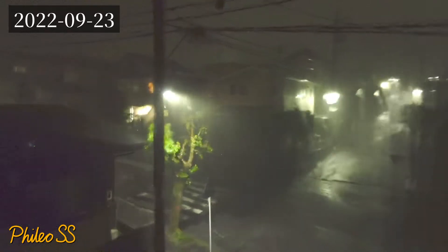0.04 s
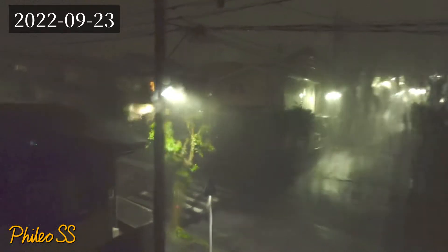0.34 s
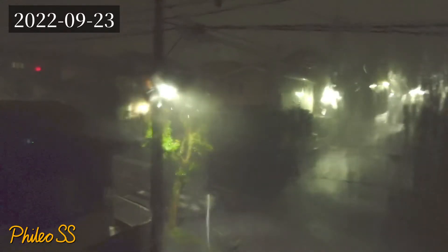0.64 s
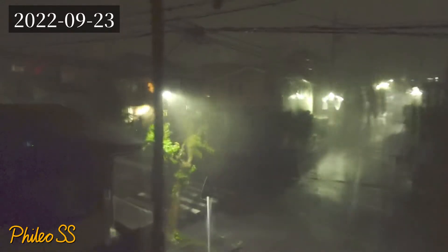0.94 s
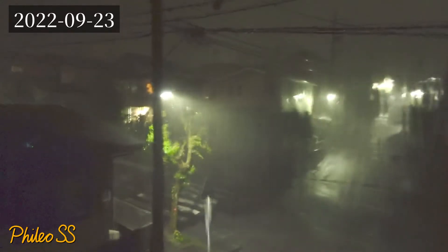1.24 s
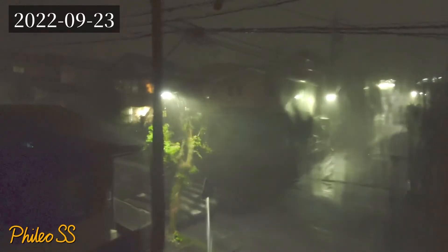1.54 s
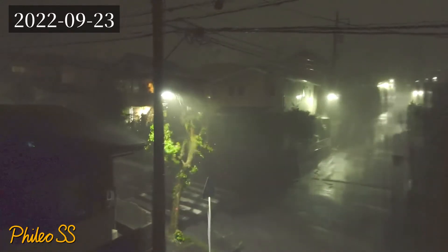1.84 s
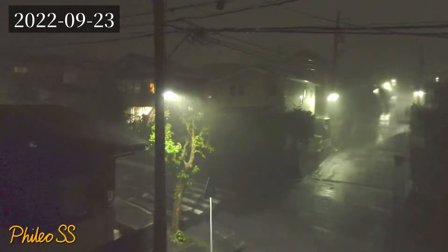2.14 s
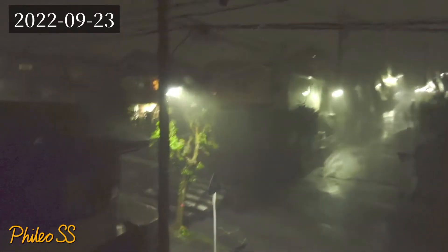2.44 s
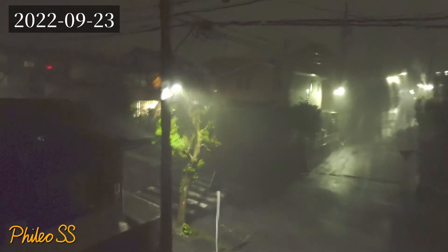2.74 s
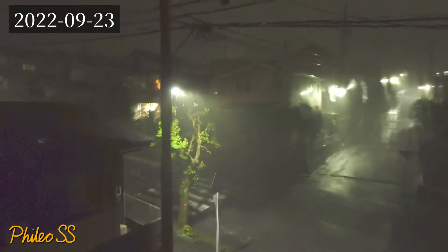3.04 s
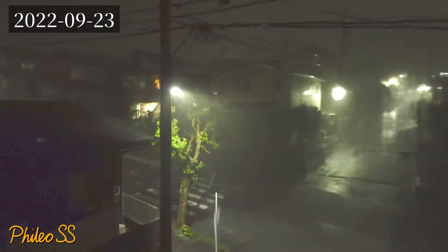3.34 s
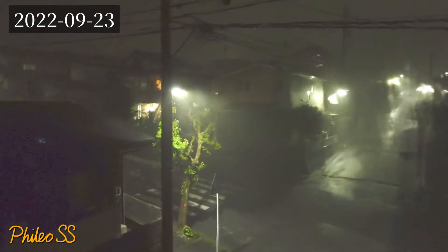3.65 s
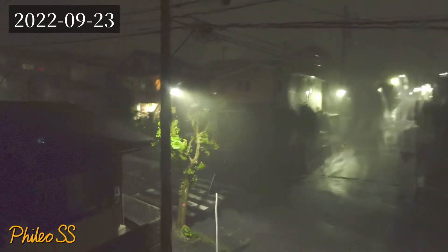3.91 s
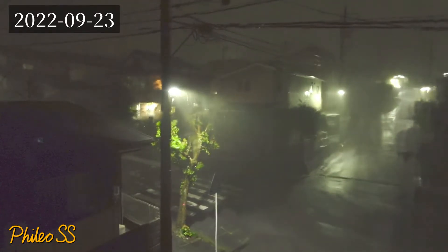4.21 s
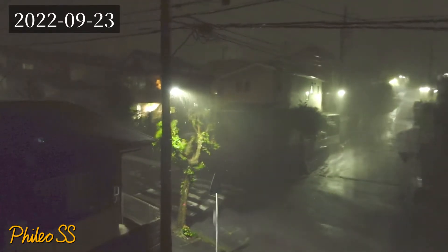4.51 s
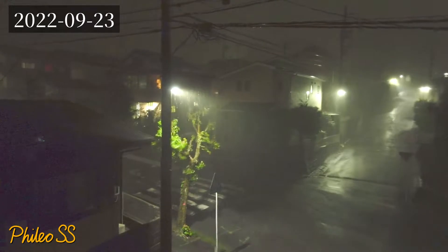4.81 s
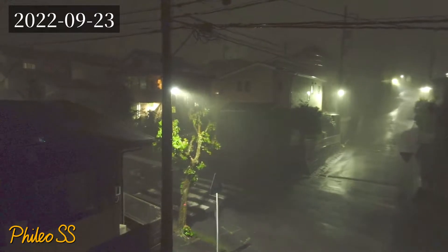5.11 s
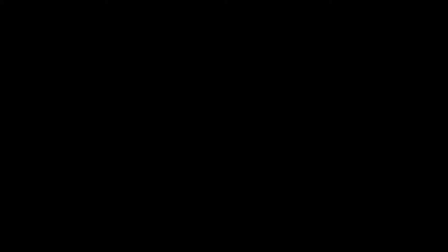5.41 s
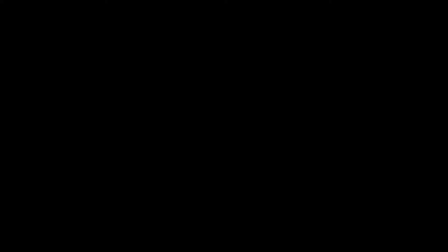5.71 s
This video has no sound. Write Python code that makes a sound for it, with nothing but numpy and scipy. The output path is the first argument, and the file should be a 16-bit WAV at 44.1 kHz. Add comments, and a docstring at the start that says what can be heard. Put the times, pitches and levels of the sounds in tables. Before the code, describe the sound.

Torrential rain falls on a residential street at night, heard from under an awning. Distant drops merge into a dense rushing hiss with tiny plinks in the puddles. Gusts throw sheets of rain onto the awning, which patters, drums and crackles with spray, while fat drips splat close by and the wind moans faintly. After about two seconds the gusts weaken and the downpour keeps easing. One dry tick comes late.

```python
"""Torrential rain on a street at night, heard from under an awning.
From the start, far drops merge into a rushing wash, with bubbles plinking in the puddles. Gusts throw
sheets of rain on the awning, which patters, drums and sprays; fat drips from its edge splat close by
and the wind moans faintly in a gap. After the first two seconds the gusts are weaker, and the downpour
keeps easing. One dry tick comes late, and the sound stops abruptly at about 5.4 s."""
import sys
import numpy as np
from scipy import signal
from scipy.fft import rfft, irfft, next_fast_len
from scipy.io import wavfile
from scipy.ndimage import uniform_filter1d

SR = 44100
rng = np.random.default_rng(int(sys.argv[2]) if len(sys.argv) > 2 else 0)


def bounce(signal):
    """Save signal as a 16-bit WAV file at the path given by the first command-line argument."""
    frames = np.transpose(np.atleast_2d(signal))
    limited = np.clip(frames, -1, 1)
    pcm = np.round(limited * 32767).astype(np.int16)
    wavfile.write(sys.argv[1], SR, pcm)


N = 258774
T = np.arange(N) / SR
STOP_S = 5.364
STRENGTH, DRUM, SPRAY = 0, 1, 2  # the three controls of the rain
STEADY_DB = (-26, -26, -41)  # their starting levels, gusts aside

# stereo image of the close sounds: f/Hz, left-right likeness/0..1
NEAR_LIKENESS = [(300, 1), (700, 0.91), (1300, 0.93), (2000, 0.59), (5000, 0.82), (8000, 0.68),
                 (11000, 0.44), (14000, .8)]


def amp(db):
    """Decibels to gain."""
    return 10 ** (np.asarray(db) / 20)


def unit_rms(x):
    """Scale to an rms of 1."""
    return x / np.sqrt(np.mean(x ** 2) + 1e-20)


def curve_at(points, hz):
    """Read a curve of (f/Hz, value) points, joined by straight lines in log frequency."""
    f, value = np.transpose(points)
    return np.interp(np.log(hz + 1), np.log(f + 1), value)


def colour(x, spectrum_db, size=8192):
    """Minimum-phase EQ with the gain spectrum_db(hz): clicks keep their sharp front."""
    hz = abs(np.fft.fftfreq(size, 1 / SR))
    log_gain = np.log(amp(np.maximum(spectrum_db(hz), -100)))
    response = np.exp(np.conj(signal.hilbert(log_gain)))
    taps = np.fft.ifft(response).real[:size // 2]
    return signal.oaconvolve(x, taps[None], axes=1)[:, :x.shape[1]]


def stereo(pair, likeness):
    """Blend two unrelated signals into left and right, alike by a share that depends on frequency."""
    size = next_fast_len(pair.shape[1])
    hz = np.fft.rfftfreq(size, 1 / SR)
    width = 1 - np.clip(curve_at(likeness, hz), 0, 1)
    width *= np.minimum(hz / 330, 1) ** 2  # long waves reach both sides alike
    mid, side = rfft(pair, size) * np.sqrt([2 - width, width])
    return irfft(np.array([mid + side, mid - side]), size)[:, :pair.shape[1]]


def wander(step_s):
    """A random curve that glides to a new value every step."""
    return np.interp(T / step_s, np.arange(N), rng.standard_normal(N))


def swell(peak_s, db, rise_s, fall_s):
    """Power of one gust over time: it builds to a fairly pointed peak and dies away."""
    from_peak = np.maximum((peak_s - T) / rise_s, (T - peak_s) / fall_s)
    return (amp(db) * np.exp(-abs(from_peak) ** 1.3)) ** 2


def rain_db(control):
    """Level of one rain control over time: gusts ride on an easing, fluttering downpour."""
    # gusts on the awning: peak t/s, strength/dB, drumming/dB, spray/dB, rise/s, fall/s
    gusts = [(.03, -27, -35, -38, 0.13, 0.066), (.2, -21.5, -39, -29.5, 0.057, 0.033),
             (.34, -19, -25, -24, 0.13, 0.24), (.52, -22.5, -25, -26, 0.12, 0.18),
             (.64, -16, -20.5, -23.5, 0.067, 0.16), (1.18, -25, -42, -35, 0.097, 0.094),
             (1.35, -22, -25.5, -25.5, 0.14, 0.29), (1.82, -28.5, -28.5, -39.5, 0.39, 0.26),
             (2.58, -29, -29.5, -42, 0.049, 0.095), (3.35, -35, -32.5, -58, 0.33, 0.44),
             (3.67, -27.5, -29, -52, 0.12, 0.13), (4.2, -42, -53, -39, 0.079, 0.15),
             (4.38, -33, -32, -45, 0.13, 0.18), (5.25, -31.5, -32, -49, 0.47, 0.39)]
    easing_db_per_s, flutter_db = 1.65, 0.65
    steady_power = amp(STEADY_DB[control] - easing_db_per_s * T) ** 2
    gust_power = sum(swell(peak_s, levels[control], rise_s, fall_s)
                     for peak_s, *levels, rise_s, fall_s in gusts)
    return 10 * np.log10(steady_power + gust_power) + flutter_db * wander(step_s=0.051)


def drops(per_s, spread_db, splash_s):
    """Random impacts of uneven size, each a brief dying burst of spatter."""
    sizes = amp(spread_db * np.minimum(rng.exponential(1, N), 5))
    impacts = sizes * (rng.random(N) < per_s / SR)
    power = signal.lfilter([1], [1, -np.exp(-2 / (splash_s * SR))], impacts ** 2)
    return unit_rms(np.sqrt(power) * rng.standard_normal((2, N)))


def patchy(x, depth_db, bands, frames):
    """Drops land on changing spots, so narrow bands swell and fade on their own."""
    spectra = signal.stft(x, nperseg=512, noverlap=384)[2]
    patches = uniform_filter1d(rng.standard_normal(spectra.shape[1:]), bands, axis=0)
    patches = unit_rms(uniform_filter1d(patches, frames, axis=1))
    return signal.istft(spectra * amp(depth_db * patches), nperseg=512, noverlap=384)[1][:, :N]


def street():
    """Countless far drops merge into a wash that swells only a little with the gusts."""
    # tone of the wet street: f/Hz, level/dB
    wash_eq = [(25, -26), (45, -19), (70, -3.5), (100, -6.5), (160, -0.5), (560, -1.5), (850, -2),
               (1130, -1.2), (1500, -1), (2100, 1.5), (2800, -0.8), (3700, -3), (5000, 0), (5900, -8.5),
               (7800, -13), (9500, -41.5), (12500, -39.5), (15700, -48)]
    # its stereo image: f/Hz, left-right likeness/0..1
    far_likeness = [(300, 0.93), (700, 0.81), (1300, 0.57), (1800, 0.92), (3000, 0.33), (4900, 0.69),
                    (7500, 0.4), (9500, .57), (11000, 0.46), (13000, .6)]
    # its lean to one side: f/Hz, left over right/dB
    lean = [(300, -1), (1100, -1.5), (1700, 3.5), (3300, 3), (5000, 1), (7000, -2.5), (9000, -10.5),
            (10800, -11), (12500, 0.5)]
    rain = drops(per_s=3100, spread_db=-1.0, splash_s=0.0014)
    rain = patchy(rain, depth_db=0.7, bands=9, frames=5)
    wash = unit_rms(stereo(colour(rain, lambda hz: curve_at(wash_eq, hz)), far_likeness))
    lean_db = curve_at(lean, np.fft.rfftfreq(N, 1 / SR))
    wash = irfft(rfft(wash) * amp([lean_db / 2, -lean_db / 2]), N)
    return wash * amp(-32 + 0.29 * (rain_db(STRENGTH) + 31))


def plinks(count=600, size=2048):
    """Drops in puddles trap bubbles: short, slightly rising notes, half buried in the wash."""
    out, t = np.zeros((2, N + size)), np.arange(size) / SR
    strength_db = rain_db(STRENGTH)
    for when, pitch, length, loud, side in rng.random((count, 5)):
        at, hz = int(when * STOP_S * SR), 1250 * 5 ** pitch
        life_s = (5 + 14 * length) / hz
        envelope = np.exp(-t / life_s) * (1 - np.exp(-t * hz))
        note = np.sin(2 * np.pi * hz * t * (1 + 0.013 * t / life_s)) * envelope
        level_db = -34 + 7.4 * loud ** 3 + 0.31 * (strength_db[at] + 25)
        out[:, at:at + size] += note * amp(level_db + 4 * (side - .5) * np.array([[1], [-1]]))
    return out[:, :N]


def patter():
    """Near drops on the awning take over from the street as a gust rises."""
    # tone of drops striking the awning: f/Hz, level/dB
    patter_eq = [(60, -42.5), (200, 0.5), (500, 5), (700, 5.5), (880, 2.5), (1140, 3.5), (1600, 2),
                 (2700, -1), (4100, 1), (4900, 3.5), (5500, -5), (7000, -5), (9000, -13.5), (12000, -28),
                 (15700, -39.5)]
    rain = drops(per_s=3500, spread_db=2.5, splash_s=0.0071)
    rain = patchy(rain, depth_db=1.7, bands=7, frames=5)
    hits = unit_rms(stereo(colour(rain, lambda hz: curve_at(patter_eq, hz)), NEAR_LIKENESS))
    exposure = 1 / (1 + amp(2.06 * (-30 - rain_db(STRENGTH))))  # in a lull few drops reach it
    return hits * exposure * amp(rain_db(STRENGTH) + 0.5)


def drumming():
    """Dense rain thuds on the awning's panel and rings its low modes, alike in both ears."""
    # the panel's modes: f/Hz, width/Hz, level/dB
    modes = [(99.9, 22, 2), (141, 22, 4.5), (161.5, 27, -10.5), (192, 24, -2.5), (238.5, 34, 7.5),
             (342.5, 25, 5.5), (409, 19, 4), (437, 35, 5), (546, 27, 6.5), (694, 31, 1), (806, 22, 3),
             (1106, 99, 8)]
    # tone of a thud: f/Hz, level/dB
    thud_eq = [(20, -47), (38, -41.5), (50, -24), (70, -11.5), (100, 0), (200, -2), (450, -2.5), (700, -5),
               (1200, -12.5), (3000, -49.5)]
    sway_below_hz, sway_follow = 170, 0.65  # the deepest sway answers a gust only in part

    def panel_db(hz):
        resonance = sum(amp(db) ** 2 / (1 + (2 * (hz - f) / width) ** 2) for f, width, db in modes)
        return 10 * np.log10(resonance + amp(-14) ** 2) + curve_at(thud_eq, hz)

    thuds = drops(per_s=1200, spread_db=1.5, splash_s=.001)[:1]
    panel = unit_rms(colour(thuds, panel_db))
    sway = signal.sosfiltfilt(signal.butter(4, sway_below_hz, fs=SR, output="sos"), panel)
    rings = patchy(panel - sway, depth_db=1.1, bands=30, frames=2)
    drum_db = rain_db(DRUM)
    sway_db = -29.5 + sway_follow * (drum_db - STEADY_DB[DRUM])
    return rings * amp(drum_db - 3) + sway * amp(sway_db)


def spray():
    """Tiny rebounding droplets crackle on top."""
    # tone of the droplets: f/Hz, level/dB
    spray_eq = [(3000, -28.5), (5500, 8.5), (7000, -0.5), (8200, 0.5), (10000, -5.5), (12000, -17.5),
                (15700, -28)]
    rain = drops(per_s=450, spread_db=2.0, splash_s=0.0024)
    rain = patchy(rain, depth_db=1.5, bands=5, frames=3)
    crackle = unit_rms(stereo(colour(rain, lambda hz: curve_at(spray_eq, hz)), NEAR_LIKENESS))
    return crackle * amp(rain_db(SPRAY) - 3)


def mist(peak_hz=10400):
    """Hard gusts shatter drops finer: very short ticks in the top treble."""
    def mist_db(hz):
        return -22 * abs(np.log2((hz + 1) / peak_hz)) - 30 * np.log2(np.maximum(hz / peak_hz, 1))

    ticks = colour(drops(per_s=900, spread_db=1.0, splash_s=.0005), mist_db)
    return unit_rms(stereo(ticks, NEAR_LIKENESS)) * amp(-16.5 + 1.21 * rain_db(SPRAY))


def splats(size=4096):
    """Each drip, fat or small, slaps, bursts into droplets and leaves a faint tail off the wall."""
    # fat drips off the edge: t/s, level/dB, splash/s, ring f/Hz, ring boost/dB, top slope/(dB/octave)
    fat_drips = [(.038, -18, 0.011, 5100, 4, -3), (.22, -16.5, .005, 8000, -7, -7),
                 (.264, -9.5, 0.0042, 6500, 0, -1), (0.327, -14.5, 0.0081, 8500, 5, 7),
                 (.35, -15.5, .0075, 7060, -7, 6), (0.42, -20.5, 0.02, 7500, 0, 6),
                 (0.613, -20, 0.0054, 6500, 14, 2), (.626, -18, 0.0086, 7000, 8, 7),
                 (.645, -14.5, 0.015, 4960, 3, 6), (0.685, -15.5, 0.0059, 4500, -5, -3),
                 (.725, -20, 0.01, 4600, 12, -5), (0.7605, -18, 0.0048, 4800, 1, -6),
                 (0.8212, -18.5, 0.0057, 6200, 8, 5), (1.151, -21.5, 0.0076, 2700, 9, -23),
                 (1.209, -25, 0.0074, 1490, 2, -18), (1.226, -25, .004, 9000, 6, 8),
                 (1.316, -16.5, .011, 4700, 2, -21), (1.358, -20, 0.0054, 6260, 5, -6),
                 (1.456, -20, .008, 6300, 0, -7), (1.539, -22, 0.016, 4400, 0, -11),
                 (1.625, -17, 0.012, 6300, 11.5, 2), (1.640, -20, 0.0092, 7500, 2, -2),
                 (1.734, -24.5, .0054, 3700, 5, -11), (2.1212, -19, 0.007, 4900, 5, 0),
                 (2.329, -32, 0.009, 1360, 18, -17), (2.357, -30, 0.011, 1310, 20, -12),
                 (2.552, -26, 0.01, 5200, 2, -11), (2.567, -28, 0.0057, 5000, 3, -13),
                 (2.6152, -20.5, 0.0053, 4190, 7, -15), (3.046, -35, .005, 7500, 6, 4),
                 (3.078, -32, .004, 8040, 8, 4), (3.622, -23.5, 0.0055, 5400, 3, -7),
                 (3.639, -21.5, 0.0069, 4400, 0, -16), (3.664, -21.5, 0.0057, 1220, 10, -14),
                 (3.838, -31, 0.013, 5500, -7, -16), (3.933, -24.5, 0.012, 1400, 6, -6),
                 (4.0857, -20.5, 0.005, 4500, 6, -12), (4.191, -25, 0.0034, 4300, 8, -16),
                 (4.24, -31.5, .012, 5950, 12, -14), (4.318, -27, 0.006, 6200, 1, -12),
                 (4.3626, -29.5, .008, 4700, 19, -11), (4.518, -33, .01, 1010, 20, -12),
                 (5.059, -33, .008, 2400, 16, -16), (5.208, -32.5, .007, 7400, 8, 0),
                 (5.323, -28.5, 0.004, 1600, 14, -5)]
    # tone of a splash: f/Hz, level/dB
    splash_eq = [(300, -17.5), (1200, 3.5), (2500, -1), (4600, 5), (5600, 0.5), (7000, -0.5), (9000, -6.5),
                 (12000, -18), (15700, -30.5)]
    ring_half_width = 0.13  # share of the ring's frequency
    out, t = np.zeros((2, N + size)), np.arange(size) / SR
    attack = 1 - np.exp(-t / 0.0014)  # a drop takes a moment to flatten and burst
    wall_tail = 0.39 * np.exp(-t / .02)
    for start_s, db, splash_s, ring_hz, ring_db, slope_db in fat_drips + small_drips():
        def splash_db(hz):
            # each drip's own treble slope makes it duller or crisper
            tilt = slope_db * np.log2(np.maximum(hz / max(ring_hz, 6500), 1))
            ring = ring_db / (1 + ((hz - ring_hz) / (ring_half_width * ring_hz)) ** 2)
            return curve_at(splash_eq, hz) + tilt + ring

        droplets = amp(2.1 * unit_rms(uniform_filter1d(rng.standard_normal(size), size=24)))
        spatter = stereo(rng.standard_normal((2, size)) * droplets, NEAR_LIKENESS)
        burst = unit_rms(colour(spatter, splash_db))
        slap = np.exp(-(t / splash_s) ** 2)
        pan_db = -1.5 + 1.3 * rng.standard_normal()  # the dripping edge lies a little to the right
        gains = amp(db + np.array([[pan_db], [-pan_db]]) / 2)
        at = round(start_s * SR)
        out[:, at:at + size] += burst * attack * (slap + wall_tail) * gains
    return out[:, :N]


def small_drips(count=24, ring_db=8, slope_db=-6.5):
    """Cues for splats(): small drips at random moments, heavier in the gusts."""
    when, loud, length, pitch = rng.random((count, 4)).T
    start_s = when * STOP_S
    surge_db = rain_db(STRENGTH)[(start_s * SR).astype(int)] - STEADY_DB[STRENGTH]
    level_db = -35 + 0.7 * surge_db + 3.5 * (2 * loud - 1)
    splash_s = 0.0071 * (.5 + length)
    ring_hz = 6200 * 2 ** (0.92 * (pitch - .5))
    return [(*drip, ring_db, slope_db) for drip in zip(start_s, level_db, splash_s, ring_hz)]


def moans(waver_hz=2, air_width_hz=24):
    """Wind across a gap: thin, breathy, wavering notes that glide as the gust passes."""
    # wind notes: peak t/s, level/dB, rise/s, fall/s, f/Hz at the peak, glide/(Hz/s)
    notes = [(.24, -30, 0.13, 0.16, 442.5, -18.5), (.76, -33, .08, .07, 446, 29.5),
             (1.21, -38, 0.043, .04, 427, 20), (1.4, -32, 0.04, .04, 454, -300),
             (1.508, -29.5, 0.07, 0.13, 434, -19.5), (1.631, -33, .05, 0.19, 401, 23.5),
             (2.22, -40.5, 0.059, .07, 432, -10.5), (3.3, -38, 0.098, 0.17, 425, 40)]
    out = np.zeros(N)
    for peak_s, db, rise_s, fall_s, hz, glide in notes:
        pitch = hz + glide * (T - peak_s) + waver_hz * wander(step_s=.06)
        phase = 2 * np.pi * np.cumsum(pitch) / SR
        air = wander(1 / air_width_hz) * np.cos(phase) + wander(1 / air_width_hz) * np.sin(phase)
        envelope = np.sqrt(swell(peak_s, db, rise_s, fall_s))
        out += unit_rms(np.sin(phase) + 0.44 * air) * envelope
    return out


def tick(at_s=4.697):
    """One thin, dry click."""
    return amp(-26) * (np.arange(N) == round(at_s * SR))


def scene():
    """The far street, the near awning and the wind together."""
    return street() + plinks() + patter() + drumming() + moans() + spray() + mist() + splats() + tick()


def record(dry):
    """Round off the tallest peaks, stop the sound abruptly and cut the very top steeply."""
    ceiling, cutoff_hz = 0.9, 15750
    rounded = dry / (1 + (dry / ceiling) ** 6) ** (1 / 6)
    gate = np.clip((STOP_S - T) / .002, 0, 1)
    low_pass = signal.firwin(511, cutoff_hz, window=("kaiser", 9), fs=SR)
    return signal.oaconvolve(rounded * gate, low_pass[None], "same", axes=1)


dry = scene()
out = record(dry)
bounce(out)
```